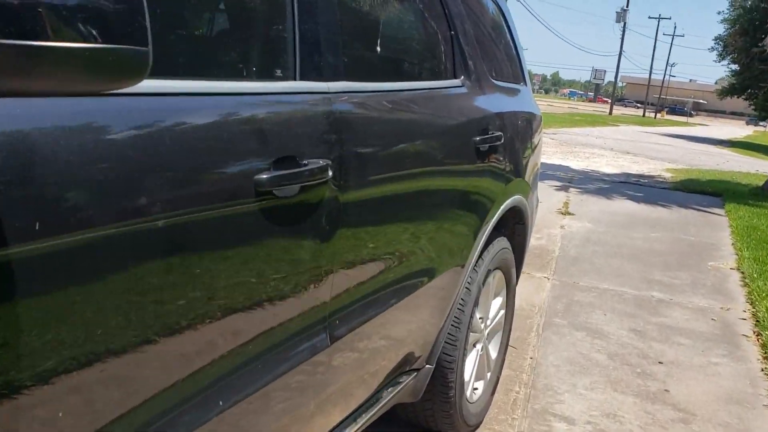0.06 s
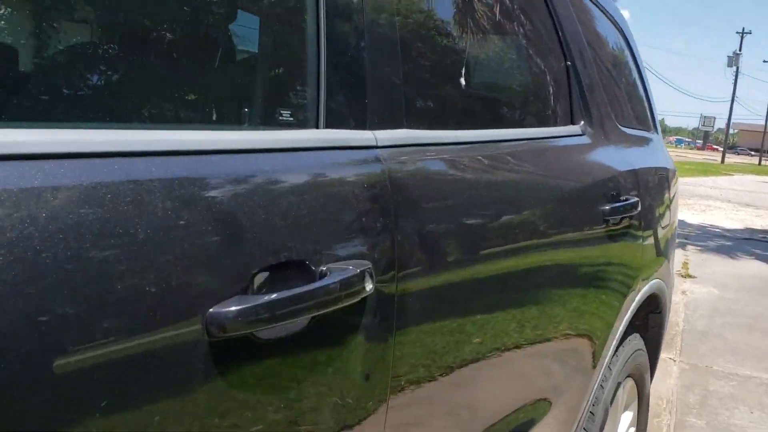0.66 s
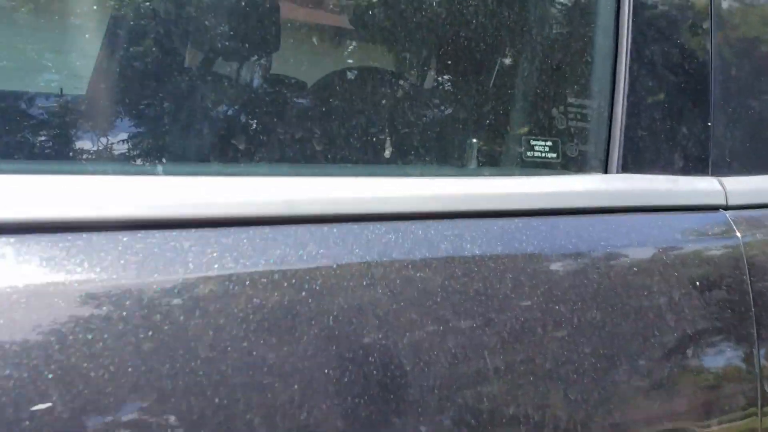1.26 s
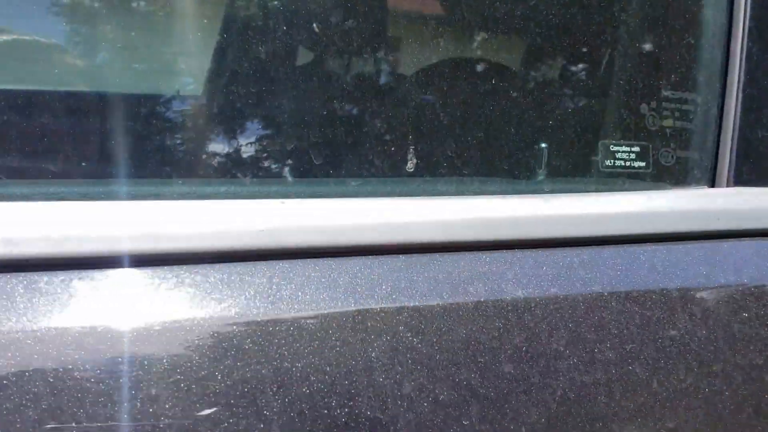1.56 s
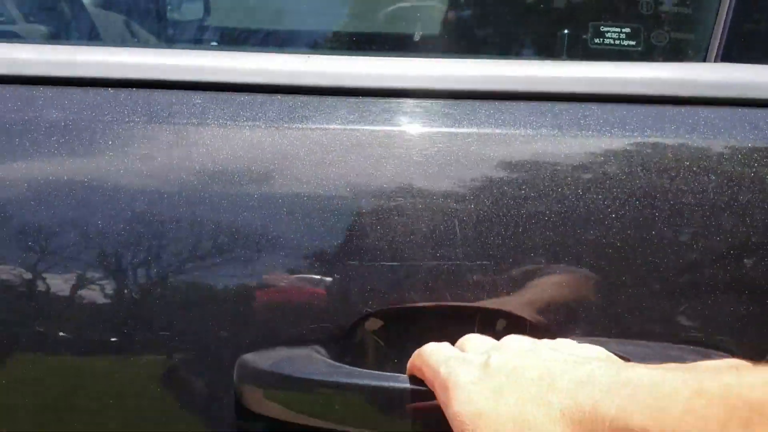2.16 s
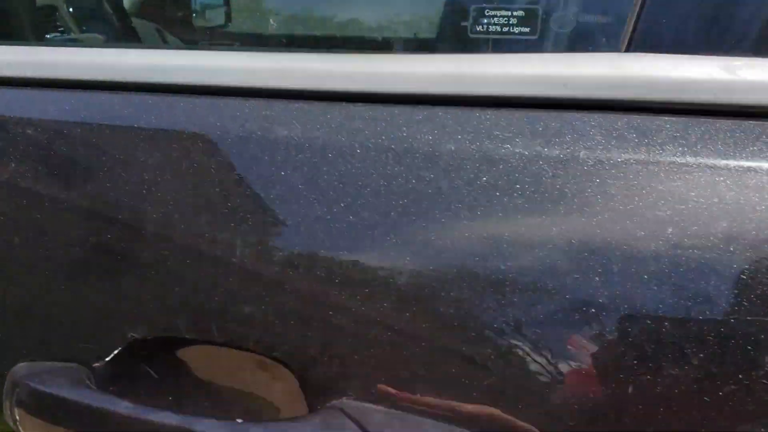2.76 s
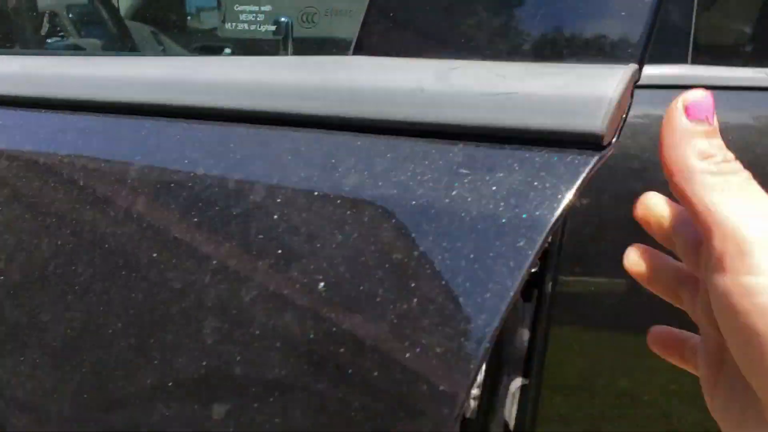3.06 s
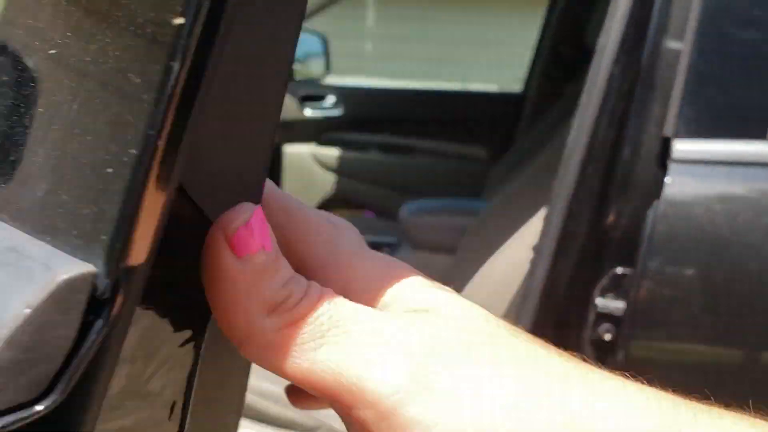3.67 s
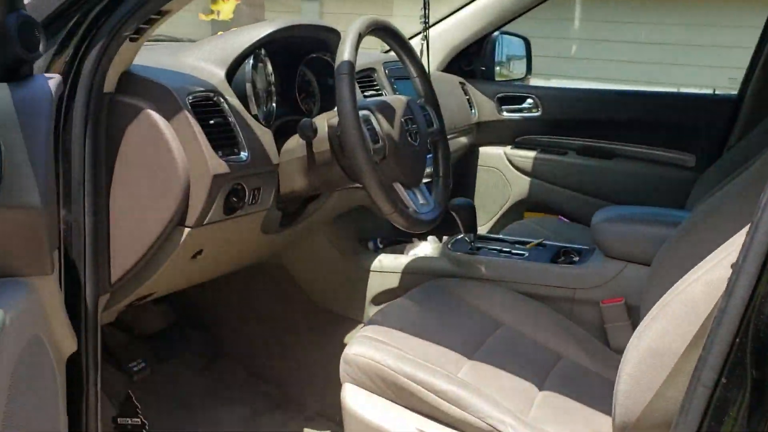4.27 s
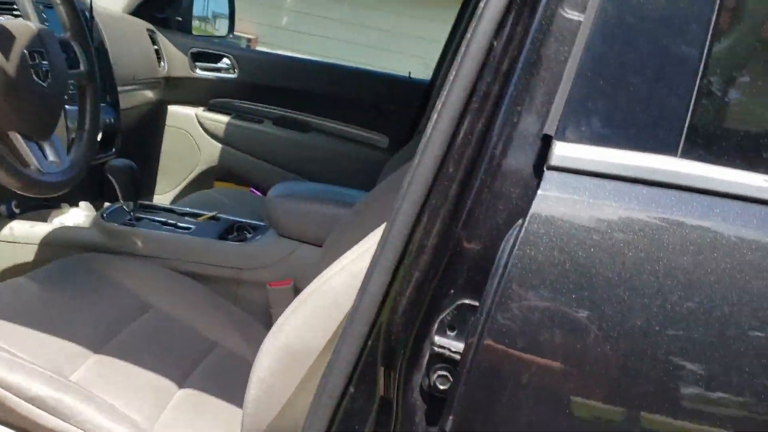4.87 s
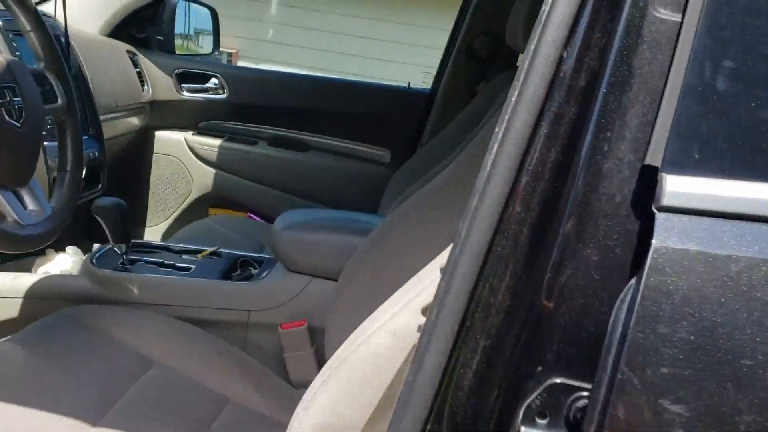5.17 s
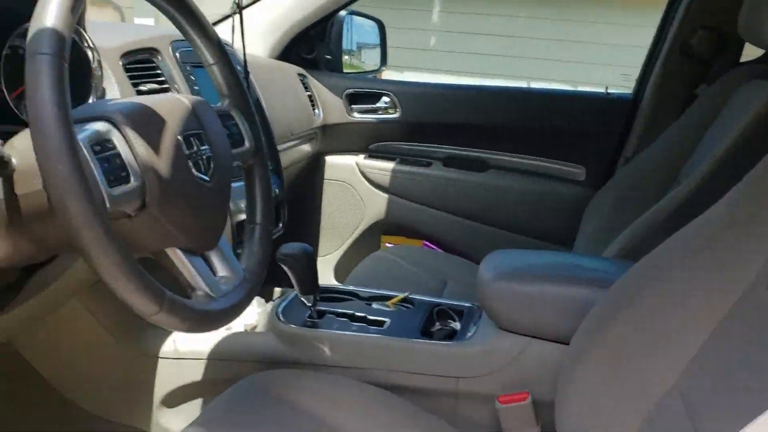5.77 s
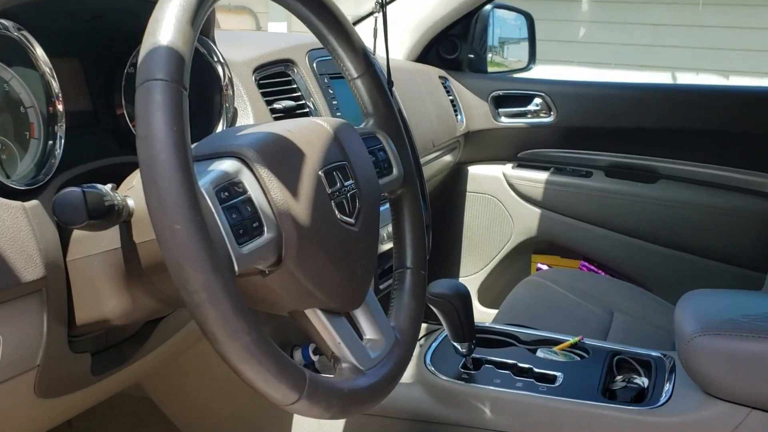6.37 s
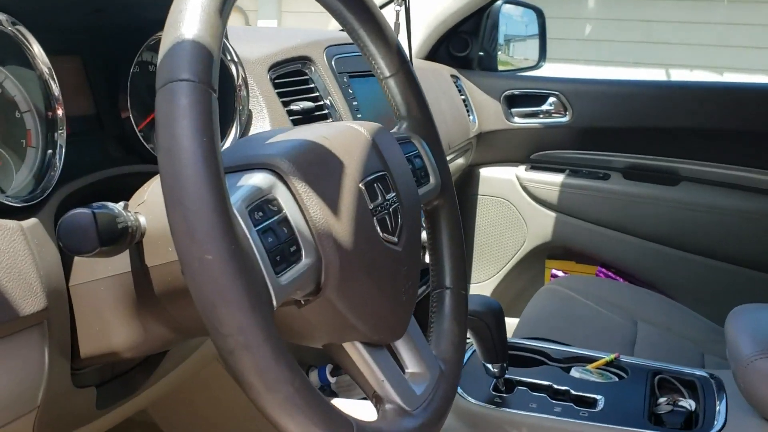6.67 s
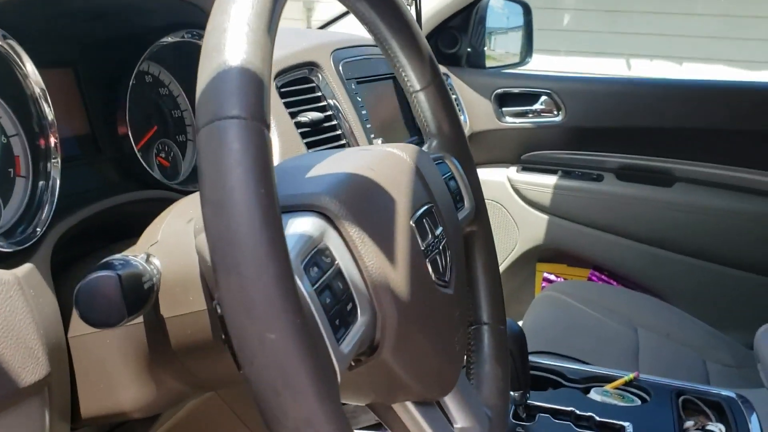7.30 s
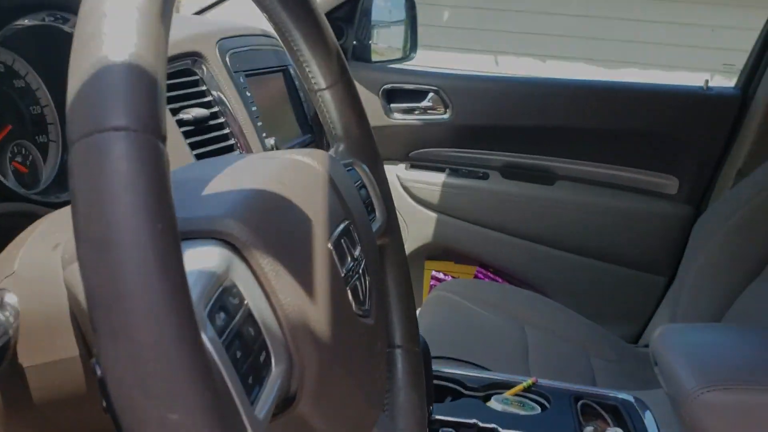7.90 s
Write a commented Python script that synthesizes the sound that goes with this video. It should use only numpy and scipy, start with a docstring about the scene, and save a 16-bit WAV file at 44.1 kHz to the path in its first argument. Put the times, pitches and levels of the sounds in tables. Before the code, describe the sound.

Soft footsteps approach a car, the door unlatches with a clunk, and someone gets in with rustling, clicks, knocks and jingling keys.

```python
"""Over light wind on a hand-held microphone and distant traffic, someone walks up to a parked car with
soft footfalls and clicks of grit. They pull the handle, which squeaks by stick-slip friction; the latch
springs free and the steel door opens, ringing in its damped modes. As they climb in, clothes rustle,
keys collide and jangle, and a far engine hums for a while. They knock against the plastic trim and
drop onto the seat with dull thumps. Each impact reverberates briefly in the hollow cabin."""
import sys
import numpy as np
from scipy import signal
from scipy.fft import rfft, irfft, next_fast_len
from scipy.io import wavfile
from scipy.ndimage import map_coordinates

SR = 44100
rng = np.random.default_rng(int(sys.argv[2]) if len(sys.argv) > 2 else 0)


def to_wav(sig):
    """Store sig (one row per channel, or 1-D mono) as 16-bit WAV at the path in sys.argv[1].

    Samples outside -1..1 are clipped; the rate is SR.
    """
    pcm = np.clip(np.atleast_2d(sig), -1, 1) * 32767
    pcm = np.round(pcm).astype(np.int16)
    wavfile.write(sys.argv[1], SR, pcm.T)  # frames by channels


N = 358974

# Slow level curves. Each row: time in seconds, level in dB.
GUST_LEVELS = [(0.0, -54), (0.43, -54.5), (1.4, -44), (1.52, -53), (2.27, -38.5), (2.29, -46), (2.43, -53),
               (2.58, -42), (2.97, -51.5), (3.06, -59), (3.13, -53), (3.67, -62.5), (3.78, -53),
               (3.92, -58.5), (7.32, -59), (7.55, -47), (7.59, -54), (8.14, -73)]  # buffeting from wind and from moving the microphone
TRAFFIC_LEVELS = [(0.0, -60.5), (1.86, -62.5), (2.06, -60.5), (3.54, -66.5), (4.6, -58), (4.83, -64.5),
                  (7.07, -62), (8.14, -66)]

# Noise spectra. Each row: frequency in Hz, relative level in dB.
WIND_SPECTRUM = [(15, -53), (25, -23), (38, -10), (52, 5), (66, 7.5), (85, -39), (140, -25), (400, -78)]
RUMBLE_SPECTRUM = [(40, -40), (65, -3), (85, 2.5), (110, -1), (150, -8.5), (230, -16), (600, -94)]
THUD_SPECTRUM = [(82, -20), (140, -2.5), (161, -6.5), (247, -8.5), (322, -13), (414, -15), (600, -51.5),
                 (780, -27), (1320, -120)]  # microphone handling, soft contacts and the door's boom
TRAFFIC_SPECTRUM = [(240, -5), (400, -1), (504, 1), (893, 0), (1310, -11.5), (1680, -7.5), (3070, -22),
                    (3930, -25), (6850, -53), (8370, -52), (10400, -15), (12100, -37), (14600, -45),
                    (16000, -24)]
CLOTH_SPECTRUM = [(180, -36), (300, 9.5), (555, 8), (689, 1), (1190, -7.5), (2000, 1.5), (3190, -3.5),
                  (3830, 0.5), (5430, -5), (8360, -13.5), (10600, -30), (14500, -33), (16000, -58)]  # fabric; also colours the rattle of loose fittings
SLIDING_SPECTRUM = [(5290, -41), (9000, -17), (10400, -7), (10500, -5), (11000, -3), (12100, -1),
                    (14500, 3), (16000, -8)]  # fine hiss of the stirred keys
BRUSH_SPECTRUM = [(290, -41), (500, 8), (1740, -8.5), (2430, -1), (2610, -23), (3860, -2), (5090, -52),
                  (7100, -26), (8330, -28), (12700, -17), (16000, -39)]
SCRAPE_SPECTRUM = [(5290, -67), (9000, -34), (9630, -38), (10300, 15), (10900, -8.5), (12600, 13),
                   (14500, 12.5), (15500, -23), (16000, -14)]  # metal on metal; also the bright edge of a click
CLACK_SPECTRUM = [(210, -37), (350, -20), (475, -4.5), (624, -13), (985, -13), (1090, -17.5), (1330, -24),
                  (1500, -32), (1950, -71), (3300, -120)]  # handle and lock housing
CRACK_SPECTRUM = [(710, -39), (1200, -18), (1340, -22), (1510, 3), (2230, -0.5), (2380, -4.5), (3050, -5),
                  (3950, -5), (4550, -12), (6300, -16), (8350, -26), (10100, -24), (14400, -15),
                  (15300, -24), (16000, -52)]  # latch metal

# Body movements. Each row: start in seconds, length in seconds, clothes level in dB, keys level in dB.
MOVEMENTS = [(0.149, 0.26, -63, -66), (0.37, 0.51, -64, -71), (0.812, 0.22, -63, -64),
             (1.05, 0.44, -62.5, -72), (1.63, 0.55, -72, -77), (1.99, 0.27, -59, -66),
             (2.686, 0.15, -56.5, -63), (2.996, 0.079, -62, -74), (3.201, 0.012, -51, -50.5),
             (4.006, 0.22, -56.5, -60), (4.236, 0.33, -54, -55.5), (4.541, 0.23, -54, -55),
             (4.755, .045, -54, -47), (4.825, 0.095, -65, -63), (5.153, 0.37, -59.5, -61),
             (5.345, 0.12, -59, -55), (5.633, 0.079, -62, -58.5), (5.764, 0.061, -58, -59),
             (6.129, .13, -51.5, -55), (6.43, 0.071, -59.5, -60.5), (6.594, .08, -46.5, -57),
             (6.743, 0.14, -54.5, -52.5), (6.893, 0.23, -58, -55), (7.102, 0.27, -54.5, -57.5),
             (7.358, 0.21, -56.5, -58), (7.497, 0.5, -65, -60.5)]
# Scuffs of a sole, hand or sleeve. Each row: start in seconds, length in seconds, level in dB.
SCUFFS = [(0.248, 0.07, -53), (1.173, 0.21, -58.5), (2.029, 0.082, -50), (2.07, 0.042, -45),
          (2.129, 0.077, -46), (2.779, 0.0084, -30.5), (3.19, 0.05, -48.5), (4.77, 0.027, -66),
          (6.593, 0.067, -46.5), (6.646, 0.039, -56), (6.822, 0.036, -46), (7.38, 0.037, -45.5)]
# Clicks of plastic and grit. Each row: start in seconds, level in dB, pitch in Hz, brightness in dB,
# T60 (the time to decay by 60 dB) in seconds.
HARD_CONTACTS = [(0.3473, -29, 5560, -21, 0.017), (0.632, -38, 3580, -6, 0.0048),
                 (1.3452, -28, 2100, -4.5, .005), (1.5114, -33.5, 3550, -16, 0.014),
                 (2.7457, -35, 1900, -12, 0.0072), (2.7803, -24, 1610, -25, 0.0086),
                 (2.7875, -8.5, 1600, -35, .018), (3.3217, -37.5, 1640, 0, 0.0045),
                 (3.344, -36, 3560, -27, 0.0088), (3.8543, -39, 3150, -4, .0087),
                 (3.895, -16.5, 3890, -13, 0.008), (4.0188, -21, 4070, -15, 0.0029),
                 (4.0409, -44, 2460, -4, .01), (4.0977, -33, 2650, -4, 0.0079), (4.105, -31, 3870, 0, .006),
                 (4.119, -29.5, 2180, -14, 0.0083), (4.156, -31.5, 5030, -3.5, 0.02),
                 (4.1813, -33, 2500, -25, 0.0076), (4.2603, -31, 2145, -5, 0.0083),
                 (4.3289, -28, 3680, -18, 0.0029), (4.366, -31.5, 3520, -6, 0.0063),
                 (4.4141, -17, 4070, 1, 0.0055), (4.438, -21.5, 1987, -13, 0.013),
                 (4.558, -28, 3740, -8, 0.0032), (4.6959, -30, 4470, -4, 0.01),
                 (4.75, -31, 5120, -1.5, 0.022), (4.7987, -31.5, 4606, -8, 0.016),
                 (4.821, -37, 4220, -11, .01), (4.9042, -38.5, 4670, -8, .01),
                 (5.265, -32, 2300, -5, 0.0063), (5.6996, -35, 6730, -1, .012),
                 (6.0328, -38, 4460, -31, 0.0071), (6.1673, -25, 3833, -2, .004),
                 (6.2189, -32, 3500, 0, 0.011), (6.2467, -28, 3640, -14, 0.015),
                 (6.3553, -31.5, 3280, 2, 0.017), (6.604, -18.5, 3470, -24, 0.012),
                 (6.6467, -20.5, 3770, -29, 0.019), (6.6551, -29, 3910, -20, .029),
                 (6.943, -34.5, 1860, -10, 0.013), (7.0738, -31, 3470, -16, 0.015),
                 (7.199, -34.5, 2180, -2, 0.0061)]
# Thumps of feet, hands and seat. Each row: start in seconds, level in dB, pitch in Hz,
# rise length relative to the period.
SOFT_CONTACTS = [(1.407, -21, 205, 0.58), (1.772, -32.5, 154, 0.68), (1.844, -33.5, 112, 0.96),
                 (2.063, -28, 68, 0.47), (2.64, -29, 172, 0.52), (3.033, -32, 72.7, 0.23),
                 (3.122, -26.5, 198, 0.41), (3.163, -38.5, 105, 0.6), (6.323, -38, 117, 0.89),
                 (7.396, -25.5, 101, 1.0), (7.5, -27.5, 96.4, 1.0), (7.922, -38.5, 105.6, 1.0)]
# Blows. Each row: start in seconds, level in dB, body pitch in Hz, relative clack level in dB,
# relative crack level in dB, factor on the ring time.
DOOR_BLOWS = [(1.934, -35.5, 142, -4.5, -20, 1.0), (2.04, -29, 163, -15.5, -18, 0.86),
              (2.077, -32.5, 160, -4, -1.5, 1.0), (2.226, -19.5, 150, -11.5, -8.5, 1.0),
              (2.698, -35, 161, -6, -25, 1.0), (2.79, -6, 251, -12.5, -12.5, 0.56),
              (2.83, -30, 235, -12, -32, 0.65)]  # on the steel door
TRIM_BLOWS = [(2.22, -16, 459, -14.5, -9.5, 1), (2.327, -34, 414, -8, -31, 1.0),
              (2.99, -21.5, 293, -13.5, -12, 1.0), (3.793, -22.5, 379.3, -14.5, -10, 0.52),
              (4.65, -28, 346, -15, -15.5, 0.72), (6.321, -19.5, 347, -5, -2, 0.45),
              (6.326, -16, 280, -18.5, -16, 0.72), (6.599, -29.5, 483, -32, 1.5, 0.99),
              (6.814, -31.5, 560, -12.5, 3.5, 0.99), (7.394, -36, 329, -9, -27, 0.87)]  # on the plastic handle and trim
# Normal modes. Each row: frequency in Hz, relative level in dB, T60 in seconds.
DOOR_MODES = [(86, -13, .2), (135, -10, .22), (172, -8, .16), (215, 1, .18), (273, -1, .17), (305, -8, .13),
              (355, -7, .14), (402, -4, .17), (447, -6, .17), (588, -9, .16), (710, -7, .16),
              (764, -9, .17), (882, -4, .16), (1032, -6, .14)]
TRIM_MODES = [(275.3, 2, 0.093), (357, 7, 0.085), (435, -3.5, 0.14), (527, -2, 0.076), (749, -6, 0.13),
              (864, -17, 0.048), (1013, 0, 0.17)]
LATCH_MODES = [(1595, -5, 0.047), (1850, -18, 0.15), (1880, 8, 0.027), (2188, -9, 0.033),
               (3770, -35, 0.062), (4050, 9, 0.016)]
# Keys striking each other. Each row: start in seconds, level in dB, most favoured frequency in Hz.
KEY_COLLISIONS = [(2.217, -31.5, 15000), (4.6623, -14, 10500), (4.6724, -21, 14280), (4.7012, -24, 14100),
                  (4.7611, -22, 14600), (4.7754, -23, 13850), (4.7924, -25, 14700), (4.8683, -29.5, 11500),
                  (4.8798, -32, 14400), (4.9155, -33, 13400), (4.9955, -34.5, 11400), (5.4221, -30, 10840),
                  (5.7698, -40, 11130), (5.8082, -34.5, 14700), (5.9145, -37, 10910), (6.1744, -17, 15000),
                  (6.2477, -33, 13200), (6.3629, -23, 14770), (6.6144, -28.5, 10900),
                  (6.9227, -18.5, 11140), (6.9494, -28, 14100), (7.0284, -34, 14400), (7.1581, -45, 12800)]
# Modes of the keys. Each row: frequency in Hz, damping (larger dies sooner), relative level in dB.
KEY_RESONANCES = [(3750, 130, -15), (4500, 110, -14), (5300, 130, -17), (7840, 60, -13), (9950, 120, -8),
                  (10910, 50, -3), (11120, 50, -3), (11490, 60, -11), (12100, 60, -10), (13200, 70, -10),
                  (13850, 60, -6), (14130, 60, -3), (14390, 80, -9), (15005, 40, 1)]
# Reverberation of the cabin. Each row: frequency in Hz, T60 in seconds.
CABIN_DECAY = [(100, 0.31), (300, 0.31), (1000, 0.16), (4000, 0.076), (15000, 0.067)]


def amp(db):
    """Amplitude ratio of a level in decibels."""
    return 10 ** (np.asarray(db) / 20)


def unit(x):
    """Normalisation to an rms of 1."""
    return x / np.sqrt(np.mean(x ** 2) + 1e-20)


def peaked(x):
    """Normalisation to a peak of 1."""
    return x / (np.abs(x).max() + 1e-20)


def along(points, hz):
    """Interpolation of (Hz, value) points on a logarithmic frequency axis."""
    freqs, values = np.transpose(points)
    return np.interp(np.log(hz + 1), np.log(freqs + 1), values)


def curve(points):
    """Linear interpolation of (seconds, value) points at every sample."""
    return np.interp(np.arange(N) / SR, *np.transpose(points))


def between(start_s, end_s, fade_s):
    """A time window with linear edges."""
    t = np.arange(N) / SR
    return np.clip(np.minimum(t - start_s, end_s - t) / fade_s, 0, 1)


def wobble(rate_hz):
    """Smooth random modulation: a spline through rate_hz Gaussian values a second."""
    knots = rng.standard_normal(int(N * rate_hz / SR) + 4)
    return map_coordinates(knots, [np.arange(N) * rate_hz / SR])


def filtered(x, response):
    """Linear filtering: the spectrum is multiplied by a frequency response."""
    size = next_fast_len(len(x) + 8192)
    return irfft(rfft(x, size) * response(np.fft.rfftfreq(size, 1 / SR)), size)[:len(x)]


def noise(spectrum, size=N):
    """White noise filtered to a spectrum, at an rms of 1."""
    return unit(filtered(rng.standard_normal(size), lambda hz: amp(along(spectrum, hz))))


def fall(t, t60, attack_s):
    """Envelope of a damped vibration: quick rise, exponential decay."""
    return amp(-60 * t / max(t60, 1e-3)) * (1 - np.exp(-t / attack_s))


def near(hz, centre_hz, octaves):
    """A resonance-shaped weight that halves at the given distance from its centre."""
    return 1 / (1 + (np.log2(hz / centre_hz) / octaves) ** 2)


def add(track, start_s, sound):
    """Superposition of a sound on the track."""
    part = track[max(round(start_s * SR), 0):][:len(sound)]
    part += sound[:len(part)]


def buffeting():
    """Wind and handling make low pressure fluctuations; gusts and a steady floor add in power."""
    gust_db = curve(GUST_LEVELS)
    wind = amp(gust_db + 0.68 * wobble(9.6)) * noise(WIND_SPECTRUM)
    rumble = np.hypot(amp(gust_db + 0.5), amp(-56)) * amp(0.8 * wobble(17)) * noise(RUMBLE_SPECTRUM)
    handling = np.hypot(amp(gust_db - 6.5), amp(-56.5)) * amp(3.2 * wobble(14)) * noise(THUD_SPECTRUM)
    return wind + rumble + handling


def traffic():
    """Many distant vehicles sum incoherently to a slowly varying noise."""
    return amp(curve(TRAFFIC_LEVELS) + 2.5 + 0.78 * wobble(3.66)) * noise(TRAFFIC_SPECTRUM)


def thin_hiss(centre_hz=10120, end_s=4.05):
    """Narrow-band noise is heard outside the car as a faint, almost pitched hiss."""
    band = unit(filtered(rng.standard_normal(N), lambda hz: near(hz + 1, centre_hz, 0.0063)))
    return amp(-84) * band * between(-1, end_s, 0.13)


def movement_gains(rise_share=0.12, settle_t60=0.28):
    """Incoherent sources add in power: each movement swells the gains of the clothes and the keys."""
    t = np.arange(N) / SR
    power = np.zeros((2, N)) + amp([[-66], [-76.5]]) ** 2  # clothes and keys at rest
    for start, length, clothes_db, keys_db in MOVEMENTS:
        rise = np.clip((t - start) / (rise_share * length), 0, 1)
        settle = amp(-60 * np.clip((t - start - length) / settle_t60, 0, 2))
        power += (amp([[clothes_db], [keys_db]]) * rise * settle) ** 2
    return np.sqrt(power)


def rustle(clothes_gain, catch_from_db=-69, catch_range_db=11):
    """Friction of fabric: a light touch whispers, a firm one sticks and slips in short puffs."""
    slips = (rng.random(N) < 200 / SR) * amp(3.4 * np.minimum(rng.exponential(size=N), 3))
    puffs = signal.fftconvolve(slips, fall(np.arange(SR // 20) / SR, 0.012, 0.000074))[:N]
    rub_db = 20 * np.log10(clothes_gain) + 1.73 * wobble(25)
    grip = np.clip((rub_db - catch_from_db) / catch_range_db, 0, 1)
    whisper = unit(noise(CLOTH_SPECTRUM) * amp(0.79 * wobble(60)))
    catching = grip * unit(puffs * noise(CLOTH_SPECTRUM))
    return amp(rub_db) * (amp(-2.5) * whisper + amp(-2) * catching)


def sliding_keys(keys_gain):
    """Sliding friction in the stirred bunch gives a fine, flickering hiss."""
    return keys_gain * noise(SLIDING_SPECTRUM) * amp(-3.5 + 2.2 * wobble(160))


def scuffs():
    """Friction of a passing sole, hand or sleeve makes a short swell of noise."""
    out = np.zeros(N)
    for start, length, db in SCUFFS:
        stroke = np.hanning(int(length * SR))
        add(out, start, amp(db) * stroke * noise(BRUSH_SPECTRUM, len(stroke)))
    return out


def click(t, pitch_hz, bright_db, t60):
    """A small hard impact excites heavily damped resonances around one pitch, and a bright tick."""
    hz = np.geomspace(700, 7500, num=16)[:, None] * np.exp(0.05 * rng.standard_normal((16, 1)))
    partials = near(hz, pitch_hz, 0.97) * np.sin(2 * np.pi * (hz * t + rng.random(hz.shape)))
    decay = fall(t, t60, 0.0001)
    snap = peaked(peaked(partials.sum(0) * decay) + 0.77 * np.sin(2 * np.pi * pitch_hz * t) * decay)
    tick = peaked(noise(SCRAPE_SPECTRUM, len(t)) * fall(t, 0.72 * t60, 0.0001))
    return snap + amp(bright_db + 2) * tick


def clicks():
    """Grit and plastic make very brief contacts, hence broad spectra."""
    out, t = np.zeros(N), np.arange(SR // 8) / SR
    for start, db, pitch_hz, bright_db, t60 in HARD_CONTACTS:
        add(out, start, amp(db) * click(t, pitch_hz, bright_db, t60))
    return out


def thumps():
    """A soft contact spreads its force over a cycle or so and excites only low frequencies."""
    out, t = np.zeros(N), np.arange(SR // 4) / SR
    for start, db, pitch_hz, rise in SOFT_CONTACTS:
        progress = t * pitch_hz / (1.4 * rise)  # 1 at the crest
        swell = (progress * np.exp(1 - progress)) ** 2
        swing = np.sin(2 * np.pi * pitch_hz * t) + amp(-14.5) * noise(THUD_SPECTRUM, len(t))
        add(out, start, amp(db + 1.5) * swing * swell)
    return out


def modes(table, t):
    """Free vibration is a sum of damped normal modes, their strengths varying from blow to blow."""
    return sum((-1) ** k * amp(db + rng.normal(0, 1)) * np.sin(2 * np.pi * hz * t) * fall(t, t60, 0.00066)
               for k, (hz, db, t60) in enumerate(table))


def blows(events, panel_modes, spot_db, spot_t60):
    """An impact drives the panel modes near its pitch; the housing clacks and hard parts crack."""
    out, t = np.zeros(N), np.arange(SR // 2) / SR
    for start, db, pitch_hz, clack_db, crack_db, ring_factor in events:
        excited = [(hz, level + 20 * np.log10(near(hz, pitch_hz, 0.56)), t60 * ring_factor)
                   for hz, level, t60 in panel_modes]
        # the struck spot itself swings for a few cycles
        spot = np.sin(2 * np.pi * pitch_hz * t) * fall(t, spot_t60 * ring_factor, 0.0035)
        body = peaked(peaked(modes(excited, t)) + amp(spot_db) * peaked(spot))
        clack = amp(clack_db + 1) * noise(CLACK_SPECTRUM, len(t)) * fall(t, 0.081, 0.00028)
        crack_decay = fall(t, 0.016, 0.0013) + amp(-16) * fall(t, 0.12, 0.0031)
        crack = amp(crack_db + 0.5) * noise(CRACK_SPECTRUM, len(t)) * crack_decay
        rattle = amp(-27) * noise(CLOTH_SPECTRUM, len(t)) * fall(t, 0.066, 0.0021)  # loose fittings
        add(out, start, amp(db) * (body + clack + crack + rattle))
    return out


def door(boom_db=-9.5, boom_t60=0.25):
    """Each blow rings the steel panel, and the hollow behind it booms by cavity resonance."""
    out = blows(DOOR_BLOWS, DOOR_MODES, spot_db=-8, spot_t60=0.036)
    t = np.arange(SR // 2) / SR
    for start, db, *_ in DOOR_BLOWS:
        add(out, start, amp(db + boom_db) * noise(THUD_SPECTRUM, len(t)) * fall(t, boom_t60, 0.0097))
    return out


def squeak(start_s=2.088, length_s=0.04, pitch_hz=820, db=-41):
    """Stick-slip friction of skin on the handle oscillates at an unsteady pitch."""
    out, stroke = np.zeros(N), np.hanning(int(length_s * SR))
    cycles = np.cumsum(pitch_hz * (1 + 0.094 * wobble(360)[:len(stroke)])) / SR
    add(out, start_s, amp(db) * stroke * np.sin(2 * np.pi * cycles))
    return out


def clink(t, ring_hz, chatter_t60):
    """Colliding keys rebound, each bounce exciting their modes anew; neighbouring keys damp the ring."""
    ring = np.zeros(len(t))
    for hz, damping, db in KEY_RESONANCES:
        size, detune, phase = rng.standard_normal(3)
        strength = amp(db + 2.9 * size) * (0.27 + near(hz, ring_hz, 0.0091))
        decay = np.exp(-t * (130 + 2.4 * damping)) + amp(-24) * fall(t, 0.13, 0.0019)
        ring += strength * np.sin(2 * np.pi * hz * (1 + 0.0039 * detune) * t + np.pi * phase) * decay
    rebounds = rng.random(len(t)) < 700 / SR
    impulses = rebounds * 0.5 * rng.standard_normal(len(t)) * fall(t, chatter_t60, 0.0002)
    impulses[0] = 1  # the first contact
    chatter = peaked(signal.fftconvolve(ring, impulses)[:len(t)])
    scrape = noise(SCRAPE_SPECTRUM, len(t)) * fall(t, chatter_t60, 0.0001)
    return peaked(chatter + amp(-24.5) * scrape)


def key_clinks():
    """Each clear collision excites the high modes of the keys and a duller tick of the key ring."""
    out, t = np.zeros(N), np.arange(SR // 8) / SR
    for start, db, ring_hz in KEY_COLLISIONS:
        keys = clink(t, ring_hz, chatter_t60=0.04)
        key_ring = amp(-16.5) * click(t, pitch_hz=4470, bright_db=-15, t60=0.019)
        add(out, start, amp(db) * (keys + key_ring))
    return out


def trim():
    """The plastic handle and trim are well damped shells, so their modes die quickly."""
    return blows(TRIM_BLOWS, TRIM_MODES, spot_db=-6.5, spot_t60=0.076)


def latch(start_s=2.789, peak_db=-17.5):
    """Sudden release sets the steel latch into free vibration."""
    out, t = np.zeros(N), np.arange(SR // 4) / SR
    add(out, start_s, amp(peak_db) * peaked(modes(LATCH_MODES, t)))
    return out


def climbing_ticks(clothes_gain, start_s=4.03, end_s=7.05, count=60):
    """Small impacts form a random process whose rate and strength follow the movement."""
    out, t = np.zeros(N), np.arange(SR // 8) / SR
    effort = np.cumsum(clothes_gain * between(start_s, end_s, 0.01))
    onsets = np.searchsorted(effort, effort[-1] * rng.random(count))
    for onset, (softness, detune) in zip(onsets, rng.standard_normal((count, 2))):
        strength = clothes_gain[onset] * amp(16 - 5 * min(softness, 1))
        tick = click(t, pitch_hz=3670 * np.exp(0.28 * detune), bright_db=-3.5, t60=0.02)
        add(out, onset / SR, strength * tick)
    return out


def loose_keys(keys_gain, start_s=4.2, end_s=7.3, count=80):
    """Hanging keys collide at random, each touch favouring one of their modes."""
    touches, t = np.zeros(N), np.arange(SR // 8) / SR
    for when, size, pick in rng.random((count, 3)):
        ring_hz = KEY_RESONANCES[int(pick * len(KEY_RESONANCES))][0]
        touch = amp(13 * size) * clink(t, ring_hz, chatter_t60=0.025)
        add(touches, start_s + when * (end_s - start_s), touch)
    return keys_gain * amp(-6) * unit(touches)


def engine_hum(start_s=4.5, end_s=6.3, pitch_hz=101.8, db=-47.5):
    """A distant engine is a nearly periodic source: one low tone wavering in pitch and level."""
    gain = amp(db + 0.67 * wobble(14)) * between(start_s, end_s, 0.13)
    cycles = np.cumsum(pitch_hz + 2.46 * wobble(14)) / SR
    return gain * np.sin(2 * np.pi * cycles)


def cabin(x):
    """Reverberation: convolution with a noise tail that decays most slowly in the bass."""
    hz, t, spectra = signal.stft(rng.standard_normal(SR // 2), SR, nperseg=256)
    decay = amp(-60 * t / along(CABIN_DECAY, hz)[:, None])
    _, tail = signal.istft(spectra * decay, SR, nperseg=256)
    return signal.fftconvolve(x, tail / np.linalg.norm(tail))[:N]


def scene():
    """Superposition of the background, the friction sounds, the contacts and their reverberation."""
    clothes_gain, keys_gain = movement_gains()
    background = buffeting() + traffic() + thin_hiss() + engine_hum()
    friction = rustle(clothes_gain) + scuffs() + squeak()
    contacts = clicks() + thumps() + door() + trim() + latch() + climbing_ticks(clothes_gain)
    contacts += sliding_keys(keys_gain) + key_clinks() + loose_keys(keys_gain)
    return (background + friction + contacts + amp(-19) * cabin(contacts))[None]


def record(dry, notch_hz=8170, top_hz=16000):
    """Frequency response of the microphone: its port cuts a treble notch, and the band ends steeply."""
    port = lambda hz: amp(-14 * near(hz + 1, notch_hz, 0.084))
    band_limit = lambda hz: 1 / np.sqrt(1 + (hz / top_hz) ** 160)
    return filtered(dry[0], lambda hz: port(hz) * band_limit(hz))[None]


dry = scene()
out = record(dry)
to_wav(out)
```